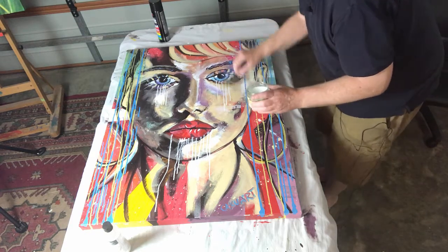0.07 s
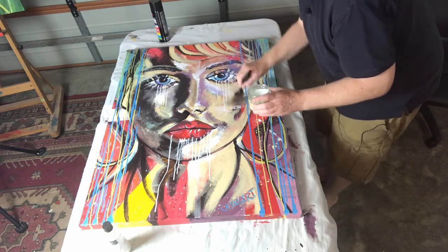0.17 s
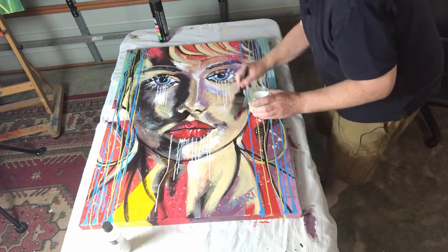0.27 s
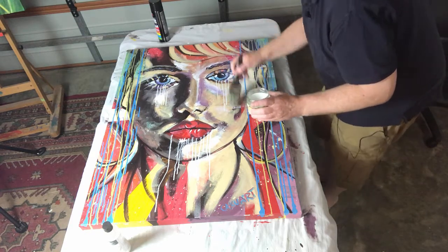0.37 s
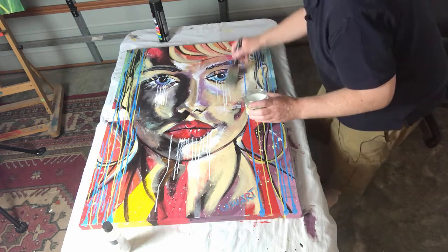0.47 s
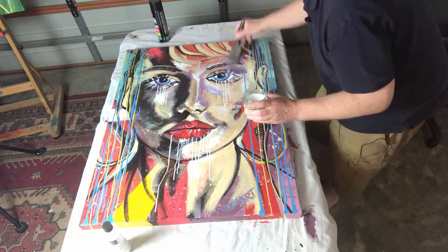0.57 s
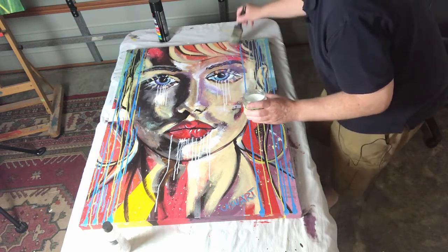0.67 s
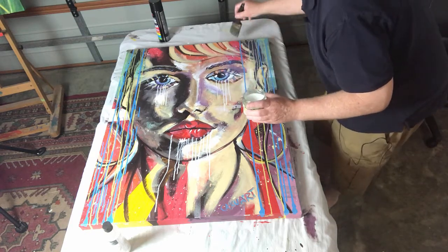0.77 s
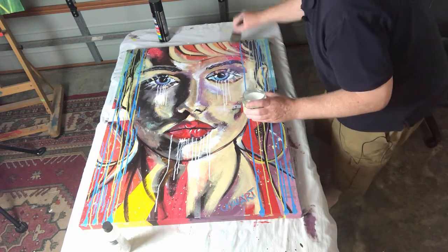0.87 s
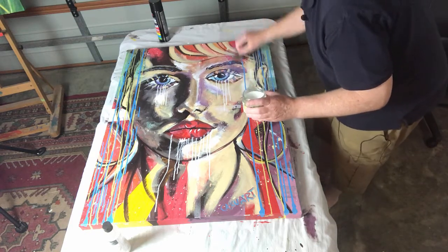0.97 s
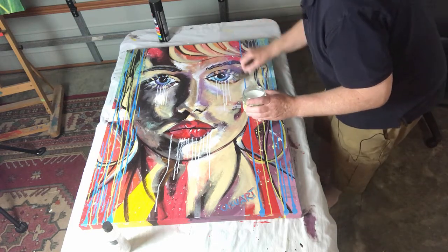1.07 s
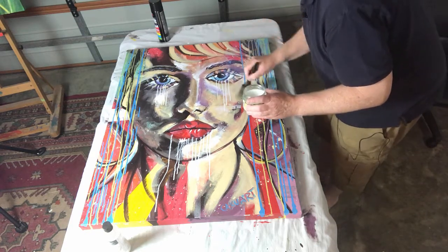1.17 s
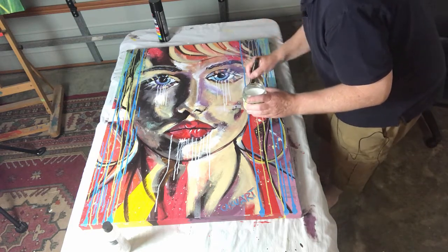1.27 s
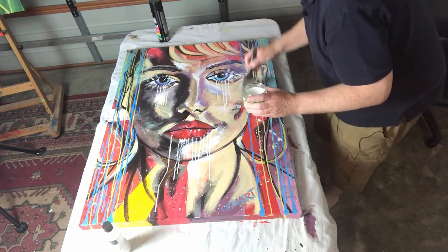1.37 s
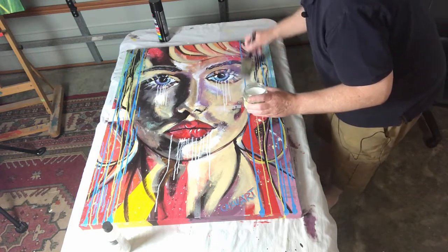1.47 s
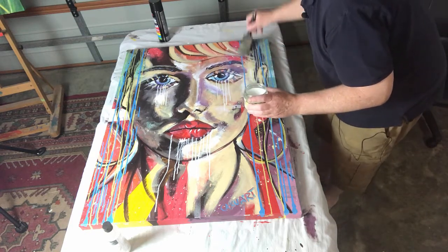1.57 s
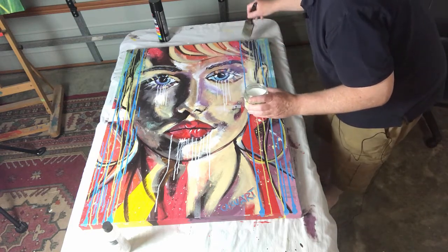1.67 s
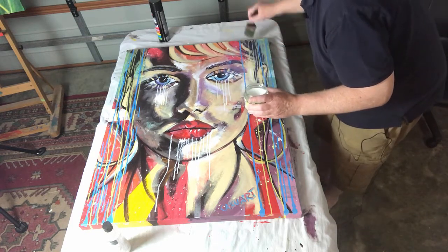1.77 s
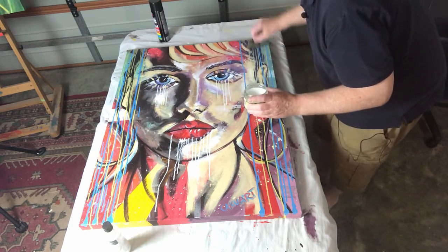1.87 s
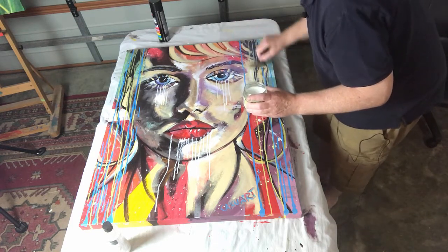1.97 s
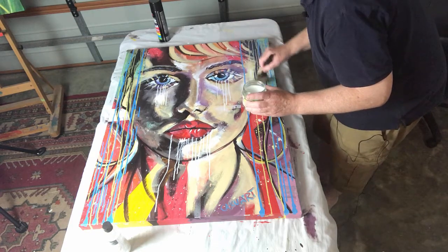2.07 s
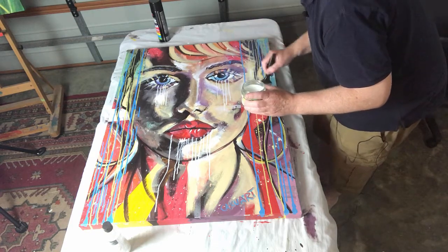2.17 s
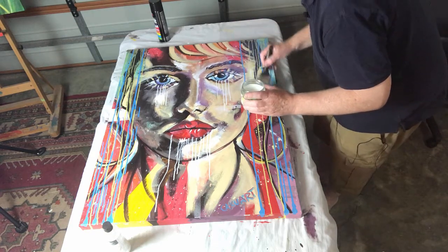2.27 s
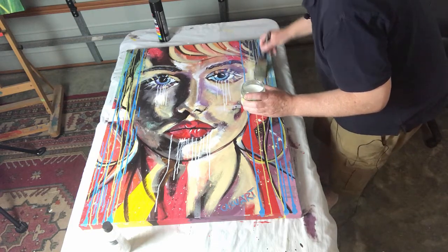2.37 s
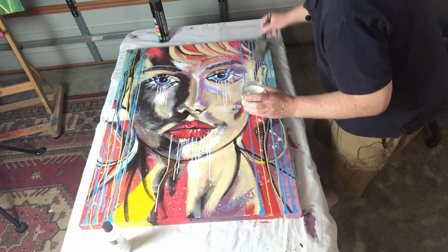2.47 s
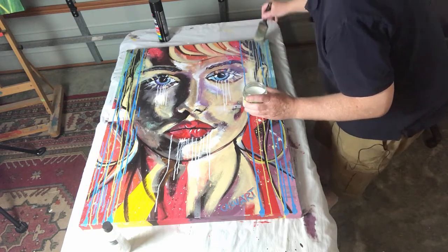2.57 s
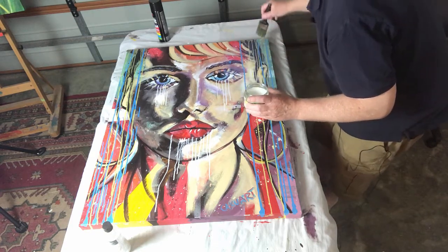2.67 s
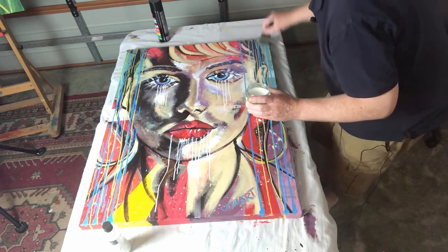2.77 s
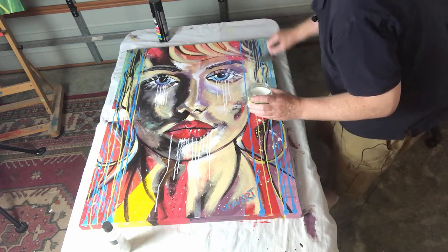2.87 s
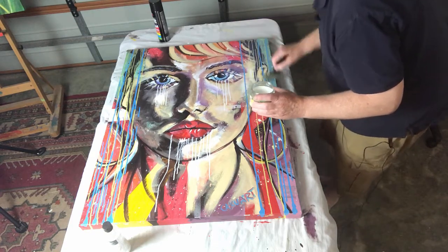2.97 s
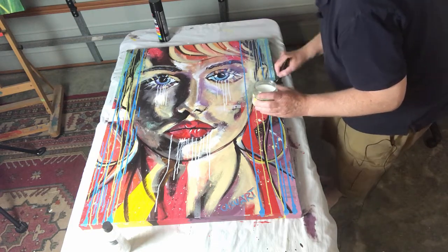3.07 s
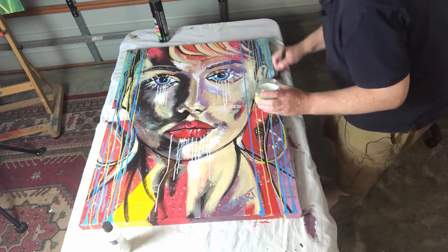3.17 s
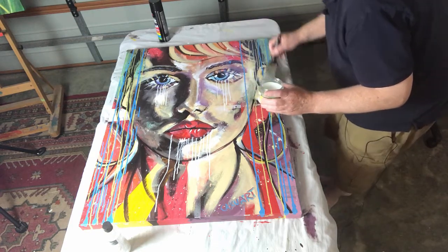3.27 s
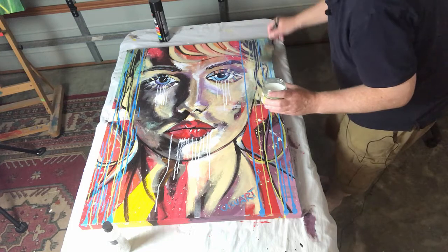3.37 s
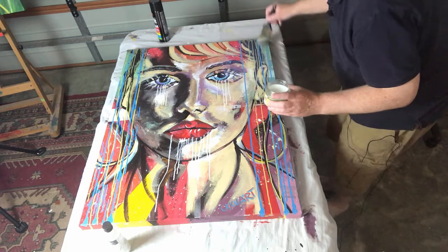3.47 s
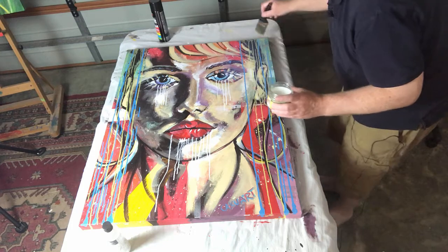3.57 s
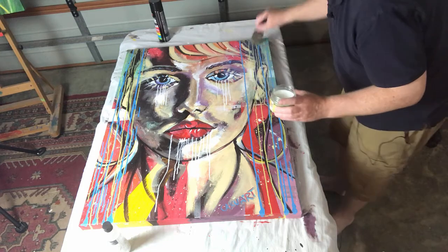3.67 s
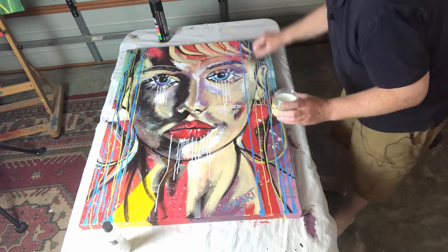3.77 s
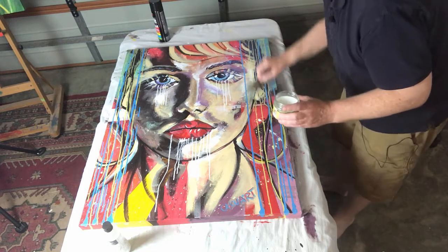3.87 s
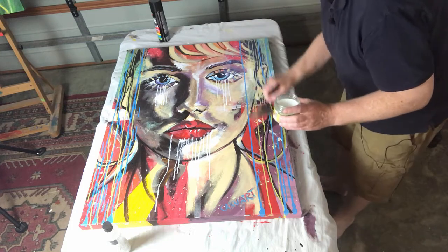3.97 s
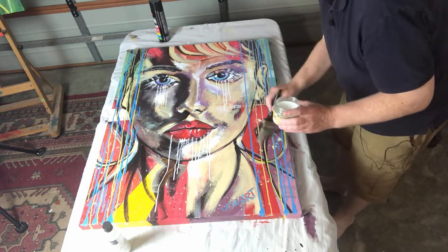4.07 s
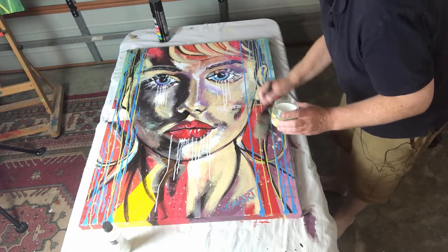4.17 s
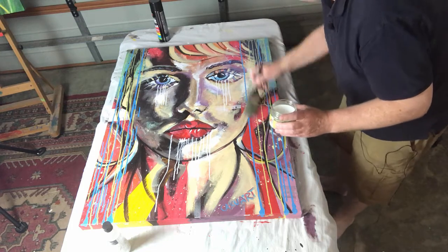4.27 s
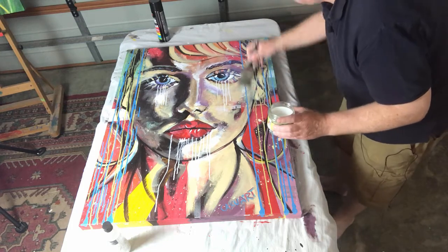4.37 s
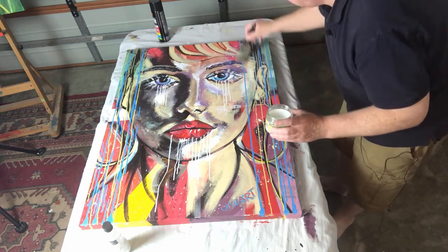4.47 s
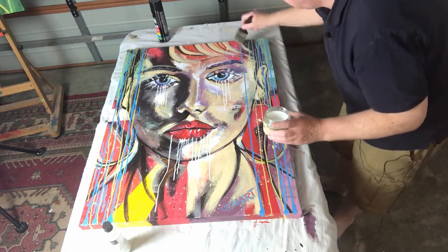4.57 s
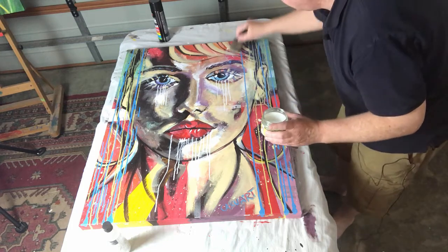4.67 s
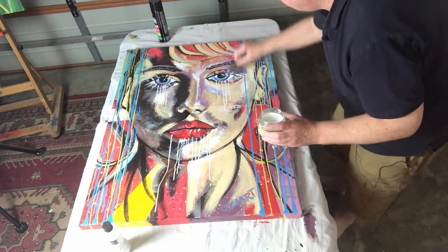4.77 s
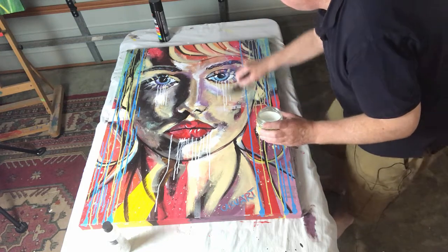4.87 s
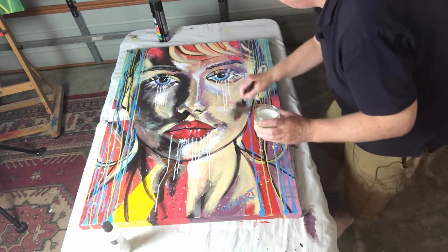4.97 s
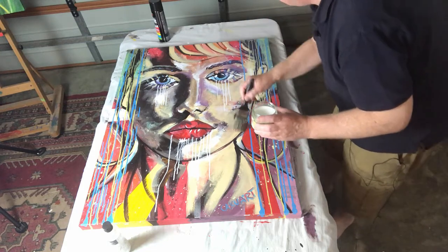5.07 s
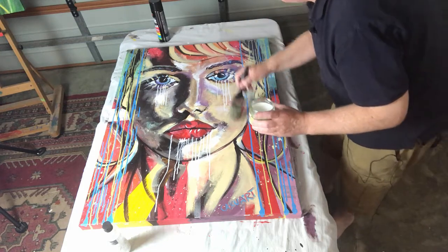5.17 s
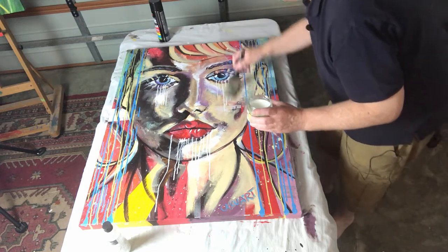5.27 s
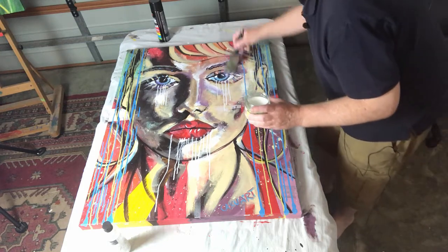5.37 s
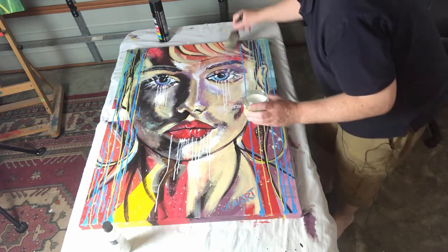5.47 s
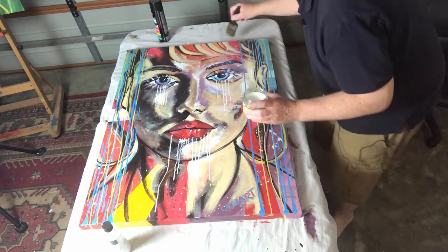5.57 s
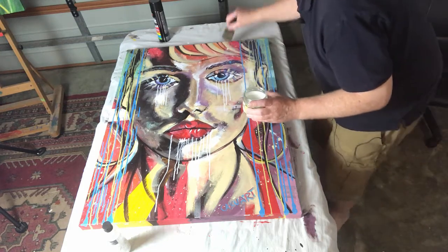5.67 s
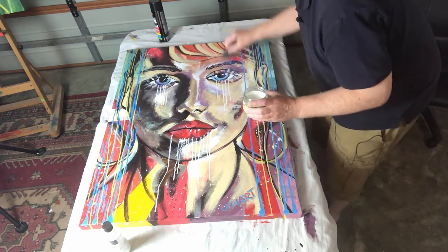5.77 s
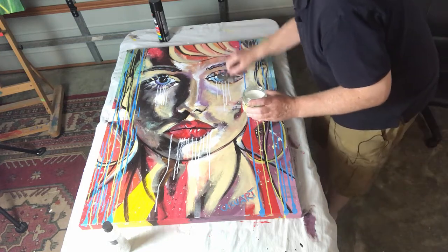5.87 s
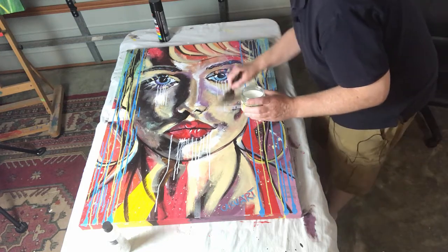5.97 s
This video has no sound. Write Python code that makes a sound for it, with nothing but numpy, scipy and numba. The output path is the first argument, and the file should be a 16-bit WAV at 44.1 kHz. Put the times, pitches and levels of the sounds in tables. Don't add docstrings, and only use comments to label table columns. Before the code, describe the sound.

A wide brush scrubs back and forth over taut canvas, each stroke a dry airy hiss with a dull drumming rasp, in a small room.

```python
import sys
import numpy as np
from scipy import signal
from scipy.fft import rfft, irfft
from scipy.io import wavfile
from scipy.ndimage import uniform_filter1d
from numba import njit

SR = 44100
rng = np.random.default_rng(int(sys.argv[2]) if len(sys.argv) > 2 else 0)


def file_out(sig):
    cols = np.atleast_2d(sig).T
    lim = np.clip(cols, -1, 1)
    pcm = np.round(lim * 32767).astype(np.int16)
    wavfile.write(sys.argv[1], SR, pcm)


def invert_db(level):
    return 10 ** (np.asarray(level, dtype=float) / 20)


N = 264688
TIME = np.arange(N) / SR
FIRM_DB = -45.5

# [cloth early level/dB, cloth late level/dB,
# weave early level/dB, weave late level/dB, tips level/dB]
STROKE_BALANCE = [(1, 0, -4, -1, 2), (-0.5, -1.5, -2.5, -8, 1.5), (1.5, -4.5, -5.5, -5.5, -2),
                  (0.5, -2.5, -0.5, -8.5, -0.5), (-2.5, -4.5, -11, -3.5, -2), (-1, -5, -1.5, -9, -1.5),
                  (-8, 0.5, -12.5, -2, -1.5), (-3, 0.5, -5.5, -4.5, -0.5), (1, 0, -3, 3, -2),
                  (-0.5, -1.5, -0.5, -5, 3.5), (0.5, -3, -6.5, -2, 0), (-0.5, 2.5, -3, -4, 0.5),
                  (4, -1, -8, -1.5, 0.5)]
TIPS_TURN_DB = [-11, -5.5, -1, -4.5, 2.5, -1, -1, 2, -1, -1, -3.5, -6.5, -0.5]


def brush():
    stroke, done, path_cm = hand()
    cloth_early, cloth_late, weave_early, weave_late, tips_db = np.array(STROKE_BALANCE)[stroke].T
    lean = np.clip((done - .2) / .6, 0, 1)
    dig_cloth_db, dig_weave_db = digs()

    press_db = pressure(TIME)
    lead_db = pressure(TIME + .008)
    trail_db = pressure(TIME - .025) - 2

    cloth_db = .66 * lead_db + cloth_early + (cloth_late - cloth_early) * lean + dig_cloth_db
    weave_db = .74 * np.maximum(press_db, trail_db) + dig_weave_db
    weave_db = weave_db + weave_early + (weave_late - weave_early) * lean
    tips_db = tips_db + (1.11 - 1) * press_db + np.array(TIPS_TURN_DB)[stroke] * (lean - .5)

    drag = grit(scatter_db=1.89, flicker_db=2.5)
    mix = invert_db(press_db) * bristle_hiss(tips_db, path_cm)
    mix = mix + invert_db(cloth_db) * cloth_drum(drag, lean)
    mix = mix + invert_db(weave_db) * weave_rasp(drag)
    return invert_db(FIRM_DB) * mix + threads()


# [t/s, hiss level/dB]
PULLS = [
    [(0.0, -44), (0.098, -38), (0.206, -52), (0.27, -83)],
    [(0.765, -68), (0.777, -53), (0.821, -43.5), (0.921, -46), (0.943, -42), (1.117, -40), (1.225, -76),
     (1.245, -72)],
    [(1.72, -67), (1.73, -54.5), (1.758, -46.5), (1.898, -39), (1.936, -45.5), (1.958, -40.5), (2.074, -43),
     (2.17, -82)],
    [(2.63, -59), (2.672, -44), (2.846, -37.5), (2.854, -39), (2.944, -37.5), (3.032, -45), (3.1, -67),
     (3.12, -75)],
    [(3.585, -64), (3.623, -49), (3.729, -38.5), (3.743, -46), (3.759, -37.5), (3.901, -34.5), (3.971, -43),
     (4.075, -69)],
    [(4.585, -69), (4.629, -50), (4.701, -42.5), (4.865, -38.5), (4.911, -41.5), (5.019, -68), (5.027, -83),
     (5.09, -75)],
    [(5.595, -71), (5.629, -51), (5.677, -43.5), (5.753, -39), (5.903, -38.5), (6.0, -57)],
]
# [t/s, hiss level/dB]
PUSHES = [
    [(0.275, -73), (0.299, -50), (0.311, -44.5), (0.323, -49.5), (0.523, -48), (0.593, -45), (0.691, -61.5),
     (0.697, -64), (0.76, -76)],
    [(1.25, -80), (1.258, -64), (1.272, -50.5), (1.312, -44.5), (1.37, -48), (1.556, -45.5), (1.644, -63.5),
     (1.648, -76), (1.715, -68)],
    [(2.175, -73), (2.183, -54), (2.251, -43.5), (2.369, -48), (2.507, -45.5), (2.561, -60.5), (2.587, -62),
     (2.595, -58), (2.625, -55)],
    [(3.125, -69), (3.133, -58), (3.167, -42), (3.187, -40), (3.359, -45.5), (3.379, -43.5), (3.427, -44),
     (3.47, -61)],
    [(4.08, -63), (4.106, -48.5), (4.22, -31.5), (4.306, -46), (4.394, -45.5), (4.426, -43.5),
     (4.522, -68.5), (4.528, -77), (4.58, -86)],
    [(5.095, -76), (5.115, -52), (5.165, -42), (5.203, -47.5), (5.303, -39.5), (5.347, -46), (5.449, -46),
     (5.533, -76), (5.59, -76)],
]


def pressure(at_s):
    s, db = np.array(sorted(row for stroke in PULLS + PUSHES for row in stroke)).T
    return np.interp(at_s, s, db) - FIRM_DB


# [t/s, path/cm]
TURNS = [(-.2, 4.4), (.26, 5.9), (.72, 4.1), (1.22, 5.5), (1.68, 3.9), (2.15, 4.5), (2.6, 3.9), (3.11, 4.4),
         (3.55, 4.0), (4.06, 5.5), (4.58, 4.7), (5.05, 7.1), (5.56, 4.1), (6.03, 6.4)]


def hand():
    s, cm = np.transpose(TURNS)
    place = np.interp(TIME, s, np.arange(len(s)))
    stroke = place.astype(int)
    done = place - stroke
    eased = np.sin(np.pi / 2 * np.minimum(done / .47, 1)) ** 2
    share = np.where(stroke % 2, eased, done)
    return stroke, done, cm[stroke] + (cm[stroke + 1] - cm[stroke]) * share


# [t/s, length/s, cloth level/dB, weave level/dB]
DIGS = [(0.087, 0.047, -0.5, -0.5), (0.446, 0.055, 4, -1), (.57, .04, -2, 1), (0.987, 0.021, 5, -5),
        (1.1, .04, 2, 6), (1.4, .04, -3, -1), (1.792, 0.031, 2.5, 7.5), (2.043, 0.029, -1.5, 6.5),
        (2.45, 0.068, 6, -0.5), (2.724, .04, 8, 1.5), (2.995, 0.037, -0.5, 0.5), (3.674, .04, -3.5, -4),
        (3.785, 0.052, 3.5, 2.5), (4.265, 0.042, 6, 2.5), (4.612, .03, 2.5, -4), (4.898, .025, 2, 3.5),
        (5.293, 0.072, 3, -1.5), (5.76, 0.027, 4, 4)]


def digs():
    return sum(np.outer(db, np.exp(-((TIME - at) / length) ** 2)) for at, length, *db in DIGS)


# [f/Hz, level/dB]
BRISTLE_COLOUR = [(2000, -18.5), (3000, -6.5), (4500, -3.5), (6500, -1.5), (9000, -1.5), (10500, -8.5)]
# [f/Hz, level/dB]
TIPS_COLOUR = [(10000, 6), (12500, 1.5), (14500, 3.5), (15900, 0)]


def bristle_hiss(tips_db, path_cm):
    rub = grit(scatter_db=2.2, flicker_db=1.7)
    peak_hz = 9250 - 900 * (path_cm - 4)
    hiss = patchy(rub, 2000, 11000, count=11, damping=.2, patchy_db=1.6)
    hiss = hiss + level(svf(slips(rub), peak_hz, .25), -6)
    tips = patchy(rub, 10500, 16000, count=4, damping=.3, patchy_db=1)
    bristles = level(colour(hiss, BRISTLE_COLOUR), 0) + invert_db(tips_db) * level(colour(tips, TIPS_COLOUR), 0)
    near_echo = .6 * late(bristles, path_cm)
    arm_echo = .22 * late(bristles, 4 * path_cm)
    return level(bristles + near_echo + arm_echo, 2.2)


def late(x, path_cm):
    lag = path_cm / 34300 * SR - 1
    return signal.lfilter([.22, .56, .22], [1], np.interp(np.arange(N) - lag, np.arange(N), x))


# [f/Hz, level/dB]
CLOTH_COLOUR = [(130, -56), (220, -17.5), (310, -9.5), (400, 1.5), (600, -1.5), (900, 1.5), (1200, -4.5)]


def cloth_drum(drag, lean):
    tone_hz = (570 + 99 * lean) * (1 + .14 * walk(12))
    cloth = patchy(drag, 150, 1150, count=18, damping=.07, patchy_db=3.5)
    cloth = cloth + level(svf(slips(drag), tone_hz, .12), -3)
    return level(colour(cloth, CLOTH_COLOUR), .092)


# [f/Hz, level/dB]
WEAVE_COLOUR = [(800, -10), (1100, -3), (1700, -3), (2400, -3), (3200, -12.5)]


def weave_rasp(drag):
    weave = patchy(drag, 900, 3100, count=14, damping=.06, patchy_db=3.6)
    return level(colour(weave, WEAVE_COLOUR), -.7)


# [start t/s, end t/s,
# start f/Hz, end f/Hz, level/dB]
THREADS = [(0.048, .17, 1650, 1560, -51), (0.292, .35, 1030, 1530, -51), (0.512, 0.628, 1620, 1200, -49),
           (1.043, 1.152, 1490, 1740, -44.5), (1.263, 1.34, 980, 1480, -50),
           (1.734, 1.795, 810, 1100, -47.5), (2.032, 2.09, 1130, 1480, -63), (2.201, 2.266, 925, 1280, -52),
           (2.338, 2.457, 1690, 1590, -51), (2.86, 3.03, 1000, 1100, -48), (3.64, 3.84, 1050, 950, -45),
           (3.142, 3.201, 910, 1330, -43.5), (3.85, 3.96, 2010, 1600, -43),
           (4.097, 4.156, 950, 1290, -45.5), (4.17, 4.31, 1050, 950, -44), (4.865, 4.946, 1600, 1850, -44),
           (5.112, 5.163, 1115, 1480, -47), (5.786, 5.978, 2000, 1630, -47.5)]


def threads():
    start, end, start_hz, end_hz, db = np.transpose(sorted(THREADS))
    hz = np.interp(TIME, np.ravel([start, end], "F"), np.ravel([start_hz, end_hz], "F"))
    swell = 0
    for a, b, d in zip(start, end, db):
        swell = swell + invert_db(d) * np.sin(np.pi * np.clip((TIME - a) / (b - a), 0, 1))
    breath = svf(svf(rng.standard_normal(N), hz, .15), hz, .15)
    return swell * level(breath, 0)


def grit(scatter_db, flicker_db):
    return invert_db(scatter_db * rng.exponential(size=N) + flicker_db * walk(30))


def slips(strength):
    return rng.standard_normal(N) * strength


def patchy(strength, low_hz, high_hz, count, damping, patchy_db):
    out = 0
    for hz in np.geomspace(low_hz, high_hz, count):
        drive = slips(strength) * invert_db(patchy_db * walk(24))
        out = out + svf(drive, hz * (1 + .03 * walk(6)), damping) / np.sqrt(hz)
    return level(out, 0)


# [t/s, peak level/dB, f/Hz, 60 dB decay t/s]
TOUCHES = [(0.301, -34.5, 606, 0.069), (0.775, -40, 463, 0.037), (.982, -30, 465, .05),
           (1.279, -40, 1114, 0.054), (1.729, -56, 850, 0.033), (3.128, -44, 974, 0.055),
           (3.586, -30, 470, 0.032), (4.111, -41, 810, 0.11), (4.603, -32.5, 506, 0.04),
           (5.112, -55, 1220, 0.034), (5.589, -44, 500, .03), (5.61, -31, 450, 0.02)]
# [t/s, peak level/dB, f/Hz, 60 dB decay t/s]
BUMPS = [(1.062, -24, 135, 0.042), (1.292, -37, 112, 0.066), (2.87, -22.5, 24, 0.14),
         (3.068, -49, 149, 0.026), (3.07, -35, 400, .025), (3.586, -33, 262, 0.023),
         (3.586, -36, 1050, 0.013), (5.29, -36, 160, 0.035), (5.70, -44, 89, 0.092), (5.77, -46, 182, 0.19),
         (.42, -48, 240, 0.093), (5.992, -22.5, 138, 0.066), (5.996, -16.5, 543, 0.013)]
# [t/s, peak level/dB, f/Hz, 60 dB decay t/s]
TICKS = [(3.3733, -26.5, 4920, .012), (3.3745, -27, 5330, 0.01), (3.3757, -33, 5770, 0.015),
         (3.3745, -32, 13400, .006), (3.4822, -26.5, 905, 0.0029), (3.4822, -30, 1340, 0.011),
         (3.4822, -37, 1590, 0.022), (3.4822, -33, 2980, 0.0024), (3.4822, -38, 2300, .004),
         (3.4822, -39, 4160, 0.0028), (3.4822, -39, 5900, 0.013), (3.4822, -39, 7750, .006),
         (3.4856, -42, 1400, .012)]


def knocks():
    return rings(TOUCHES, rise_turns=.56) + rings(BUMPS, rise_turns=.37) + rings(TICKS, rise_turns=.042)


def rings(events, rise_turns):
    out = np.zeros(N)
    for s, db, hz, t60 in events:
        first = int(s * SR)
        t = np.maximum(TIME - s, 0)[first:int((s + t60) * SR)]
        rise = 1 - np.exp(-t * hz / rise_turns)
        decay = 1000. ** (-t / t60)
        out[first:first + len(t)] += invert_db(db) * rise * decay * np.sin(2 * np.pi * hz * t)
    return out


def room(x):
    t, noise = TIME[:SR // 2], rng.standard_normal(SR // 2)
    dull = signal.sosfilt(signal.butter(2, 7900, fs=SR, output="sos"), noise)
    tail = dull * 1000. ** (-t / .66) + (noise - dull) * 1000. ** (-t / .5)
    tail = tail * (t > .003)
    return signal.fftconvolve(x, tail / np.linalg.norm(tail))[:N] * invert_db(-11)


# [f/Hz, level/dB]
AIR_COLOUR = [(3, -2), (8, 0), (18, -8), (30, -15), (45, -22), (75, -29), (125, -30), (200, -36),
              (320, -45)]
# [f/Hz, level/dB per Hz]
STILL_COLOUR = [(120, -29), (200, 0.5), (327, -11.5), (785, -19.5), (1130, -24), (3830, -19), (9190, -21),
                (15600, -34)]
# [t/s, level above the rumble/dB]
GUSTS = [
    (.35, 10),
    (1.38, 9),
    (2.32, 7),
    (3.18, 11.5),
    (3.93, 5),
    (4.21, 6),
    (5.41, 7),
    (5.6, 5),
]


def background():
    gusts_db = sum(db * np.exp(-((TIME - s) / .029) ** 2) for s, db in GUSTS)
    air_db = -42.5 + 1.5 * walk(6) + gusts_db
    air = level(colour(rng.standard_normal(N), AIR_COLOUR), 0) * invert_db(air_db)
    hum = level(np.sin(2 * np.pi * 50 * TIME), -65) * invert_db(.46 * walk(1.34))
    still = level(colour(rng.standard_normal(N), STILL_COLOUR), -63)
    return air + hum + still


def level(x, db):
    return x * invert_db(db) / np.sqrt(np.mean(x ** 2))


def colour(x, points):
    hz, db = np.transpose(points)
    octave = np.log2(np.maximum(np.fft.rfftfreq(N, 1 / SR), .5))
    below = np.maximum(np.log2(hz[0]) - octave, 0)
    above = np.maximum(octave - np.log2(hz[-1]), 0)
    return irfft(rfft(x) * invert_db(np.interp(octave, np.log2(hz), db) - 30 * (below + above)), N)


@njit
def svf(x, hz, damping):
    y, band, low = np.empty(len(x)), 0., 0.
    for i in range(len(x)):
        g = np.tan(np.pi * hz[i] / SR)
        v = (band + g * (x[i] - low)) / (1 + g * (g + damping))
        band, low, y[i] = 2 * v - band, low + 2 * g * v, damping * v
    return y


def walk(rate):
    k = int(SR / rate)
    held = np.repeat(rng.standard_normal(N // k + 1), k)
    return 1.135 * uniform_filter1d(uniform_filter1d(held, k), k)[:N]


def scene():
    near = brush() + knocks()
    return np.tile(near + room(near) + background(), (2, 1))


# [t/s, low f/Hz, high f/Hz, level/dB]
FLECKS = [
    (2.385, 9600, 11100, -60),
    (3.31, 4200, 5170, -66),
    (3.36, 6900, 8300, -55),
    (4.79, 8350, 10400, -49),
    (4.79, 11700, 13800, -52),
    (5.889, 4660, 5760, -49),
]


def side_flecks():
    side = 0
    for s, low_hz, high_hz, db in FLECKS:
        sos = signal.butter(8, [low_hz, high_hz], "band", fs=SR, output="sos")
        band = signal.sosfilt(sos, rng.standard_normal(N))
        side = side + level(band, db) * np.cos(np.pi * np.clip((TIME - s) / .046, -.5, .5))
    return side * np.array([[1], [-1]])


def top_cut(x):
    return signal.sosfilt(signal.butter(12, 15650, fs=SR, output="sos"), x)


def record(dry):
    top = signal.ellip(10, .2, 80, 15650, fs=SR, output="sos")
    return top_cut(signal.sosfilt(top, dry + side_flecks()))


dry = scene()
out = record(dry)
file_out(out)
```